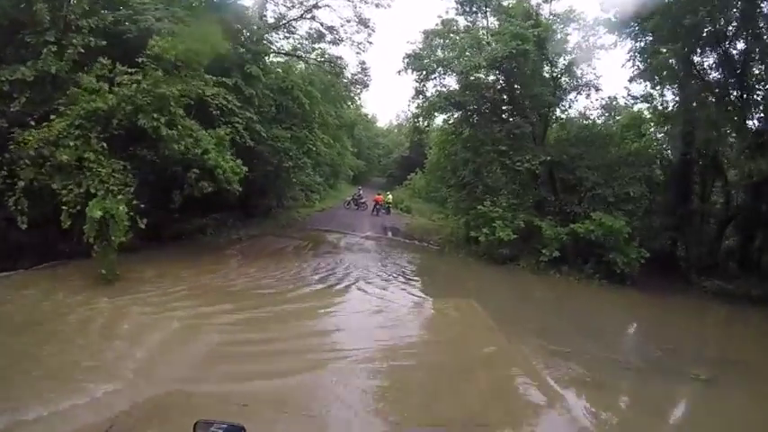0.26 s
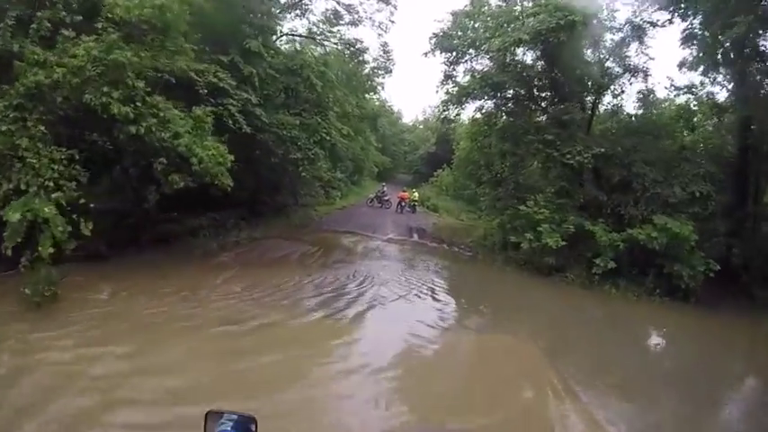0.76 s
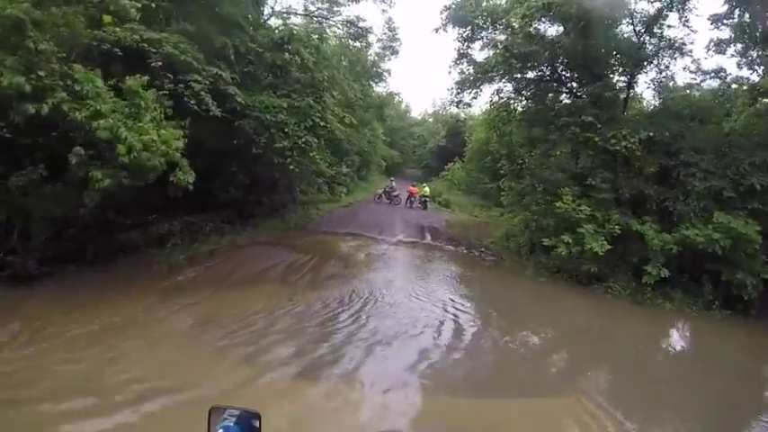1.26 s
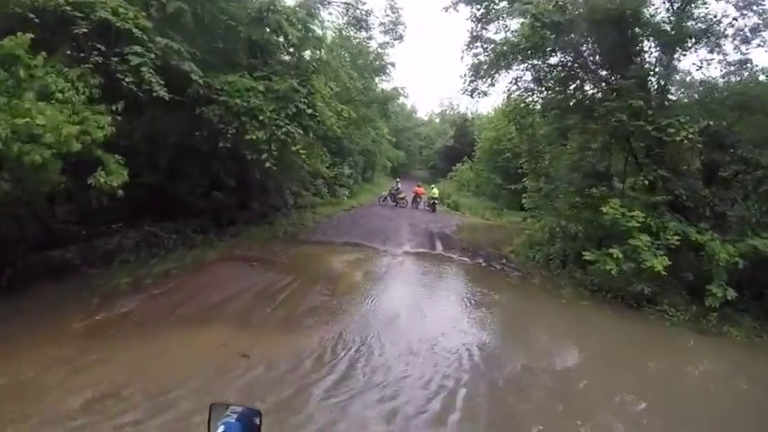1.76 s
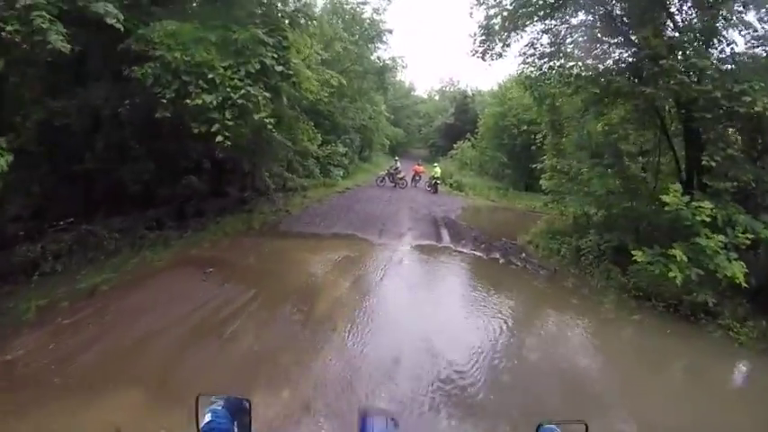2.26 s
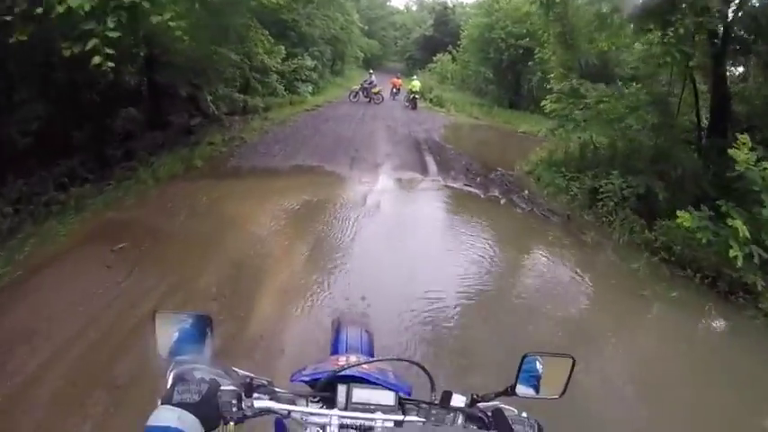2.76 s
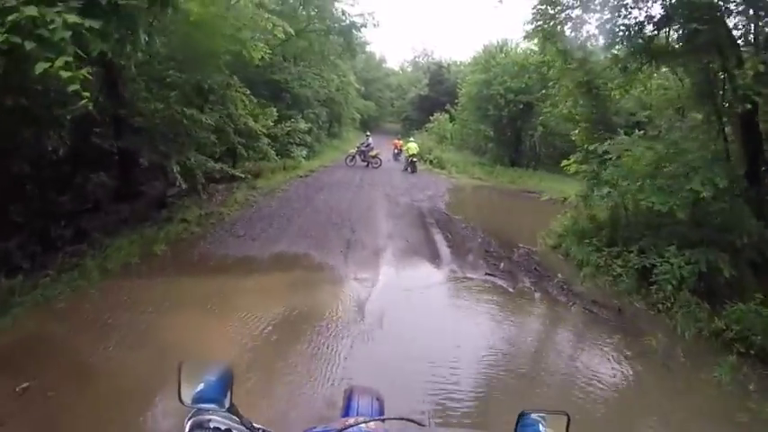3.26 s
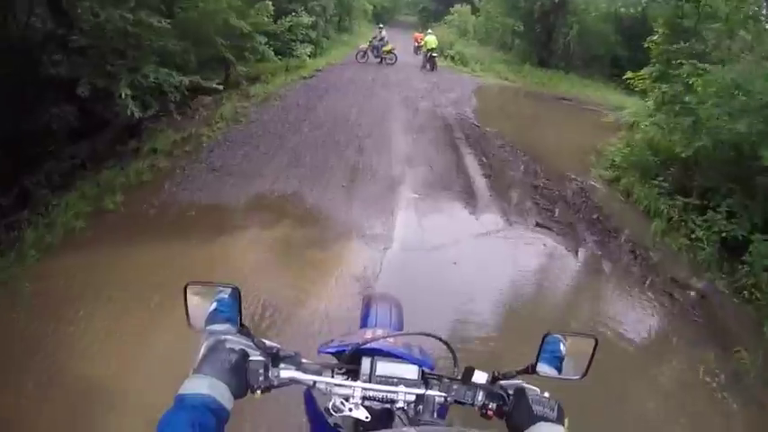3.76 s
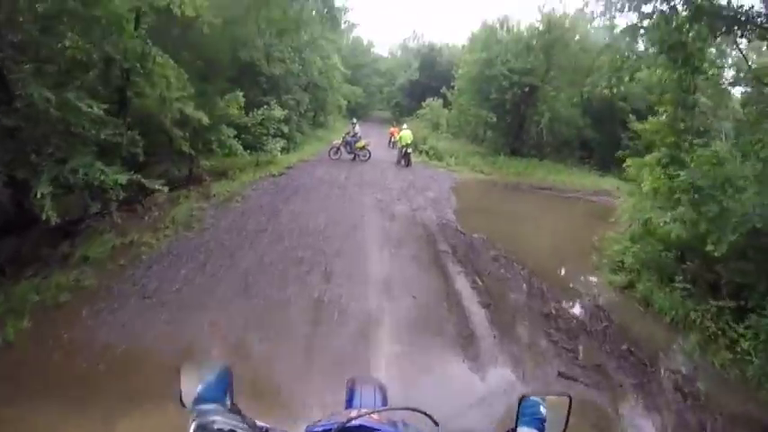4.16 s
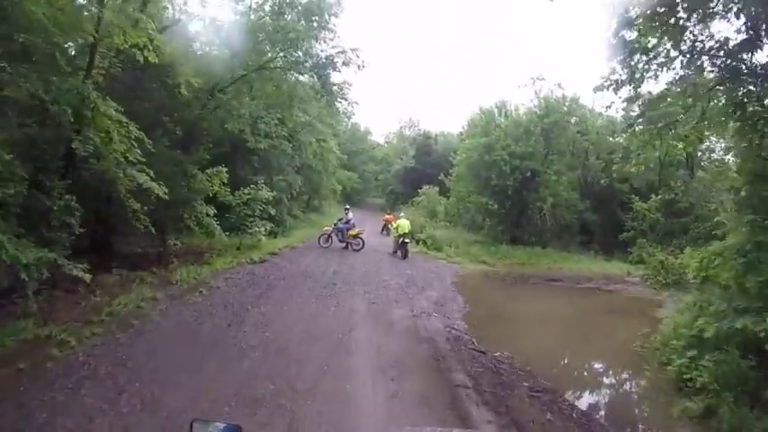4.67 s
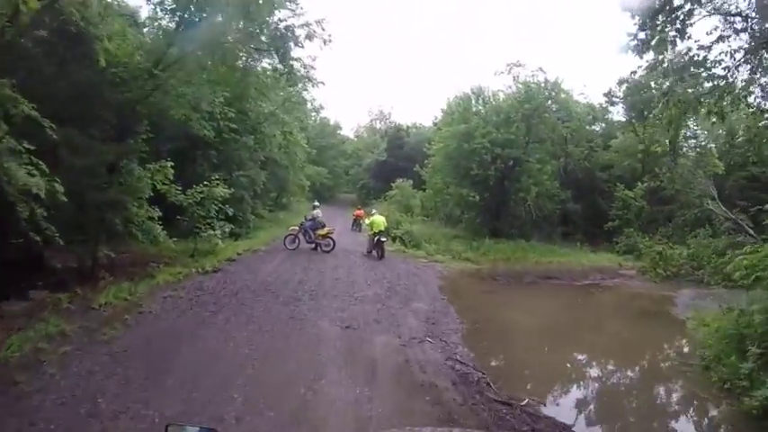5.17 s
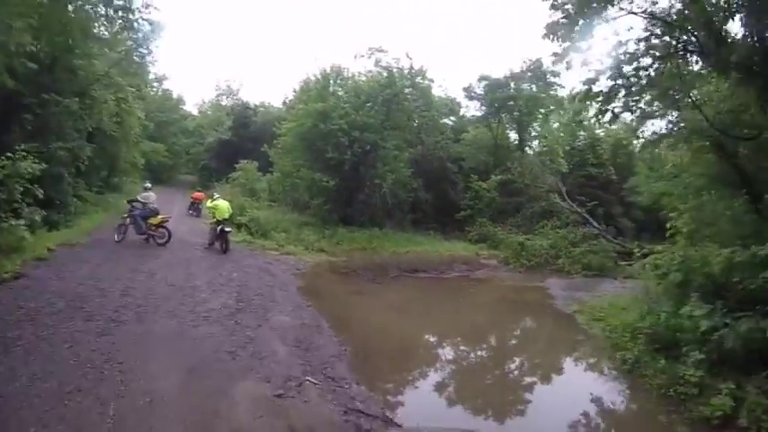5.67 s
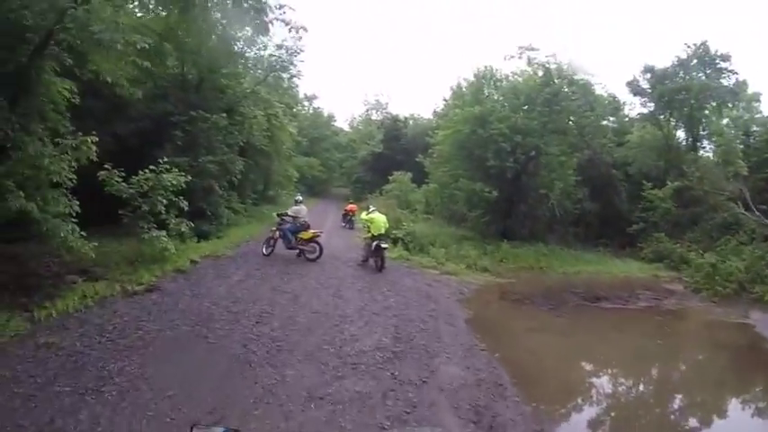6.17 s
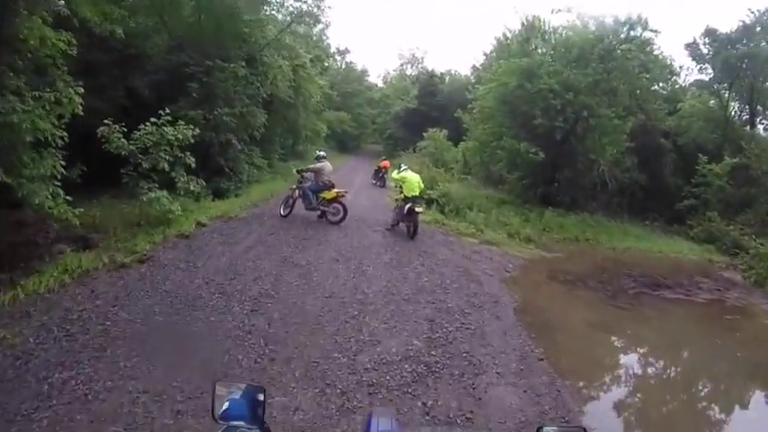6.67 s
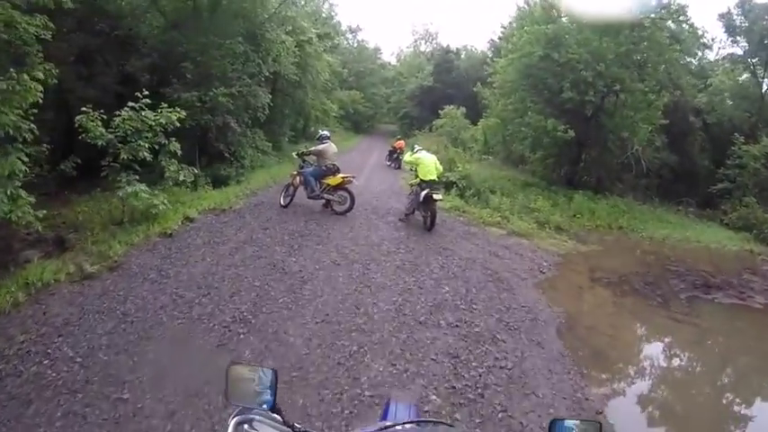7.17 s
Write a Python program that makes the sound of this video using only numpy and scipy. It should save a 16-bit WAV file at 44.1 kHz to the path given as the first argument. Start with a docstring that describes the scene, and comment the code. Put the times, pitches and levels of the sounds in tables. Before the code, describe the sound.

A single-cylinder trail motorcycle is heard close from the rider's helmet, slightly boxed in by a sealed microphone case. From 0 to 2.5 s it chugs at about seventeen firings a second through shallow water: low hollow thumps, raspy intake pulses, faint valve rattle, a deep fluctuating hum, wind rumble and steady hissing spray. A sharp tick with a dull knock lands at 1.2 s; smaller ticks and a knock cluster around 1.9-2.6 s. Around 2.8-3.3 s the engine slows to about fourteen beats, then pulls harder as spray thins and gravel crunch emerges. Knocks and ticks come at 4.4-5.0 s. At 5.3 s a brief throttle blip rises with an airbox honk, drops by 5.9 s, and leaves a softer, slower idle near twelve beats a second. Spray dies away near 7 s, with a last tick and thud, low wind and light crunch until the end at 7.4 s.

```python
"""A single-cylinder trail motorcycle plods through flooded gravel, climbs out, blips and idles.
Each firing excites the damped modes of the exhaust; crank-locked shake, intake and valve noise go with it.
A deep hum locks to the crank near its own pitch. Shaped noise makes the wind, spray and tyre crunch;
decaying modes make sharp ticks and dull knocks. The microphone rides on the helmet in a sealed case,
which colours the spray, the tyres and the valve clatter."""
import sys
import numpy as np
from scipy import signal
from scipy.fft import rfft, irfft, next_fast_len
from scipy.io import wavfile
from scipy.ndimage import uniform_filter1d, map_coordinates

SR = 44100
rng = np.random.default_rng(int(sys.argv[2]) if len(sys.argv) > 2 else 0)


def store_pcm(level_fs):
    """Save levels as 16-bit WAV."""
    pcm = np.round(np.clip(level_fs, -1, 1) * 32767).astype(np.int16)
    wavfile.write(sys.argv[1], SR, np.atleast_2d(pcm).T)


N = 327663
TIME = np.arange(N) / SR  # s

# engine speed: start_s, firings_per_s
ENGINE_SPEED = [(0.0, 18.334), (0.2, 17.282), (1.45, 17.125), (1.9, 16.322), (2.35, 17.013), (2.8, 14.248),
                (3.3, 14.293), (3.6, 15.185), (4.3, 16.05), (5.1, 16.501), (5.33, 23.461), (5.6, 15.369),
                (5.9, 12.425), (6.2, 12.756), (7.43, 12.546)]
# engine load: start_s, thump_db (before a fixed lift), gas_heat (0 cool to 1 hot)
ENGINE_LOAD = [(0, -48, 0.85), (1.3, -47, 0.98), (2.4, -48.5, 0.9), (2.8, -50.5, 0.74), (3.3, -49, 0),
               (3.7, -46, 0.67), (4.5, -47.5, 1), (5.3, -48, 0.63), (5.5, -51.5, 0), (5.65, -55, 0),
               (5.75, -51, 0.45), (6.3, -53, 0), (7.43, -52, 0.3)]
# modes of exhaust pipe and silencer with hot gas: pitch_hz, relative_level_db, t60_s
PIPE_MODES = [(71, -14, 0.017), (87.3, -7.5, 0.28), (100.4, 4.5, 0.22), (206.5, -8.5, 0.097),
              (226.4, -10.5, 0.22), (264.3, 2.5, 0.15), (289.7, -2, 0.11), (325, -7, 0.14),
              (341.7, -18, 0.36), (453, 5.5, 0.11)]
# frame resonance that answers the piston shake: pitch_hz, width_hz
FRAME_RESONANCE = (52.8, 9.3)
# engine noise spectra, relative: pitch_hz, density_db (per Hz)
INTAKE_SPECTRUM = [(300, -42), (500, -2.5), (640, -3), (740, -30.5), (860, -6.5), (1050, 2), (1300, -0.5),
                   (1600, -5.5), (2500, -46)]
AIRBOX_SPECTRUM = [(560, -32), (660, -5), (740, -4), (810, -3), (950, -37)]
CLATTER_SPECTRUM = [(900, -15), (1500, 1.5), (2500, -1.5), (4000, -25), (6000, -22), (10000, -61)]
# deep hum before smoothing and flicker: start_s, level_db
HUM_LEVEL = [(0, -22), (.18, -31), (.33, -21), (.85, -29.5), (1.4, -20.5), (1.7, -27.5), (2.05, -23),
             (2.16, -30), (2.28, -22.5), (2.37, -26.5), (2.55, -20), (3.0, -29.5), (3.3, -39),
             (3.65, -21.5), (3.96, -33.5), (4.17, -21.5), (4.45, -36), (4.8, -24.5), (5.03, -41),
             (5.1, -25.5), (5.24, -23.5), (5.33, -32.5), (5.44, -27.5), (5.8, -35.5), (6.2, -32.5),
             (6.8, -35.5), (7.1, -31), (7.43, -38.5)]
# surroundings: start_s, wind_db, spray_db, gravel_db
ROAD_LEVELS = [(0, -32, -41, -60), (.8, -32.5, -42, -57), (1.5, -34.5, -42.5, -53), (2.1, -25.5, -41, -53),
               (2.8, -28.5, -42.5, -52), (3.6, -36.5, -47, -48), (4.2, -44, -48, -48),
               (4.7, -31.5, -50.5, -47.5), (5.3, -41, -50, -48), (5.8, -36, -51, -50.5),
               (6.5, -34.5, -52.5, -50), (7.0, -29.5, -66, -47), (7.43, -30, -71, -47.5)]
# spectra of the surroundings, relative: pitch_hz, density_db (per Hz)
WIND_SPECTRUM = [(3, -25), (6, 2.5), (12, 4), (22, 0), (33, -15), (44, -0.5), (58, -17), (90, -21.5),
                 (150, -33), (300, -58.5), (600, -120)]
SPRAY_SPECTRUM = [(40, -47), (90, 6), (160, -4.5), (300, -3.5), (400, -7), (800, -10), (1500, 1.5),
                  (3000, -2), (4800, -14), (8500, -26.5), (12000, -27), (15500, -30.5)]
GRAVEL_SPECTRUM = [(40, -36), (100, 2), (170, 1.5), (300, -8.5), (450, -5.5), (550, -15.5), (640, -9),
                   (840, -12), (1500, -6), (2200, -2.5), (3000, -7.5), (4800, -18.5), (8500, -31.5),
                   (15500, -35)]
# resonances and notches of the microphone case: pitch_hz, width_hz, boost_db
CASE_MODES = [(970, 110, 4), (1260, 100, 4), (1413, 370, -8.5), (1850, 90, 1.5), (1902, 138, -5),
              (2173, 210, -4.5), (2460, 252, 7), (2652, 96, 4), (2802, 275, -5.5), (3835, 250, 6),
              (4870, 160, -2), (5505, 470, 9), (7020, 1350, 7.5), (10220, 1900, 5), (12600, 370, 7.5)]
# sharp ticks, as of stones flung on the bodywork: start_s, peak_db, tilt_db_per_octave (about 2 kHz)
TICK_EVENTS = [(0.3894, -33, 8), (1.178, -16, -1.5), (1.8723, -32, -13), (2.0063, -22.5, -3),
               (2.1686, -30, 0), (2.243, -25, -10), (2.3075, -27.5, -2), (2.5682, -30, 4),
               (4.6241, -30, -13), (5.0118, -21, -6), (6.9813, -23.5, 2), (7.394, -33, 4)]
# bodywork modes that a tick excites, before tilt and scatter: pitch_hz, relative_level_db, t60_s
SHELL_MODES = [(800, -12, .008), (1250, -4, .011), (1680, 0, .015), (2100, -2, .011), (2550, 0, .015),
               (3150, -12, .008), (3850, -11, .015), (5500, -24, .01)]
# dull knocks through the frame: start_s, level_db (before a fixed lift and a slow onset)
KNOCK_EVENTS = [(1.179, -44), (2.0, -38.5), (2.804, -56), (3.088, -58), (3.278, -45), (4.372, -42.5),
                (4.479, -47), (4.623, -41), (5.024, -43), (6.987, -37.5)]

KNOCK_HZ, KNOCK_T60_S = 150, 0.25
SHAKE_DB, COOL_BOOM_DB = -43, 3  # shake at resonance; extra low-mode drive with cool gas
# levels at mean load, and the dB gained per dB of load
INTAKE_DB, INTAKE_FOLLOWS = -56.5, 0.4
CLATTER_DB, CLATTER_FOLLOWS = -54, -0.24
# the hum's own pitch, its locking range, and its flicker when free (depth, knots per s)
HUM_HZ, PULL_HZ, FLICKER_DB, FLICKER_RATE = 33.6, 2.2, 4, 14
TOP_HZ = 15300  # upper band limit


def amp(db):
    """Amplitude gain is exponential in level in dB."""
    return 10 ** (np.asarray(db) / 20)


def unit(x):
    """Normalisation to rms 1 separates spectrum from level."""
    return x / np.sqrt(np.mean(x ** 2) + 1e-20)


def curves(rows):
    """Linear interpolation gives each column after the time one value per sample."""
    start_s, *columns = np.transpose(rows)
    return [np.interp(TIME, start_s, column) for column in columns]


def wobble(rate):
    """A spline through random knots, rate of them a second, gives smooth fluctuation."""
    knots = rng.standard_normal(int(N * rate / SR) + 4)
    return map_coordinates(knots, [TIME * rate])


def filtered(x, response):
    """A linear filter multiplies the spectrum by its frequency response."""
    size = next_fast_len(N + SR // 2)
    return irfft(rfft(x, size) * response(np.fft.rfftfreq(size, 1 / SR)), size)[:N]


def rush(spectrum, patchy_db, grit):
    """Turbulent noise of rms 1: dense noise plus sparse grains, patchy in time and frequency."""
    grains = rng.standard_normal(N) * (rng.random(N) < 300 / SR)  # about 300 a second
    noise = rng.standard_normal(N) + grit * unit(grains)
    cells = signal.stft(noise, nperseg=512)[2]
    field = uniform_filter1d(rng.standard_normal(cells.shape), size=6, axis=0)
    field = uniform_filter1d(field, size=12, axis=1)
    patchy = signal.istft(cells * amp(patchy_db * unit(field)), nperseg=512)[1][:N]
    hz, db = np.transpose(spectrum)

    def colour(f):
        return amp(np.interp(np.log(f + 1), np.log(hz + 1), db))
    return unit(filtered(patchy, colour))


def ring(hz, db, t60, t):
    """A damped mode is a sine that loses 60 dB in t60 seconds."""
    return amp(db - 60 * t / t60) * np.sin(2 * np.pi * hz * t)


def case(x):
    """Transmission through the sealed case superposes resonant boosts and notches in dB."""
    def response(f):
        return amp(sum(db / (1 + ((f - hz) / (width / 2)) ** 2) for hz, width, db in CASE_MODES))
    return filtered(x, response)


def crank():
    """Integrating the firing rate gives the cycles gone by in a four-stroke engine."""
    speed, = curves(ENGINE_SPEED)
    return speed, np.cumsum(speed) / SR


def exhaust(cycles, thump_db, heat):
    """Each firing excites the pipe modes; sound is slower in cooler gas, so their pitch drops."""
    fired = np.flatnonzero(np.diff(np.floor(cycles), prepend=-1))
    boom_db = COOL_BOOM_DB * (1 - heat[fired])
    heat = np.clip(heat, 0, 1)
    t = np.arange(SR // 4) / SR
    thumps = np.zeros(N)
    for hz, db, t60 in PIPE_MODES:
        kicks = np.zeros(N)
        # no two burns feed the modes alike
        kicks[fired] = amp(.8 * rng.standard_normal(len(fired)) + boom_db * (hz < 150))
        thumps += signal.fftconvolve(kicks * heat, ring(hz, db, t60, t))[:N]
        thumps += signal.fftconvolve(kicks * (1 - heat), ring(.945 * hz, db, t60, t))[:N]

    def silencer(f):  # 0.8 ms delay and a steep low-pass
        return np.exp(-2j * np.pi * f * .0008) / (1 + (f / 355) ** 10)
    return amp(thump_db + 6.5) * unit(filtered(thumps, silencer))


def piston_shake(cycles):
    """Forced vibration: the piston reverses four times a cycle and drives the frame resonance."""
    reversals = np.sqrt(2) * np.cos(2 * np.pi * 4 * (cycles - .035))
    hz, width = FRAME_RESONANCE

    def frame(f):
        return 1j * f * width / (hz ** 2 - f ** 2 + 1j * f * width)
    return filtered(amp(SHAKE_DB + 1.2 * wobble(1.9)) * reversals, frame)


def intake_and_airbox(speed, cycles, load_db):
    """Periodic inflow before each thump modulates intake noise; the airbox honks as revs rise."""
    gulp = amp(6 * np.cos(2 * np.pi * (cycles - .85)) + 1.2 * wobble(14))
    intake_db = INTAKE_DB + INTAKE_FOLLOWS * load_db
    intake = amp(intake_db) * unit(gulp * rush(INTAKE_SPECTRUM, patchy_db=-1.0, grit=0.68))
    honk_db = -55 + 1.6 * np.minimum(speed - 20, 0)  # full from 20 firings per s
    honk = amp(honk_db) * unit(np.sqrt(gulp) * rush(AIRBOX_SPECTRUM, patchy_db=1, grit=0))
    return intake + honk


def valve_clatter(cycles, load_db):
    """Amplitude modulation once per crank turn makes the valve gear rattle."""
    rattle = amp(5 * np.cos(2 * np.pi * 2 * (cycles - .15)) + 2.5 * wobble(30))
    clatter_db = CLATTER_DB + CLATTER_FOLLOWS * load_db
    return amp(clatter_db) * unit(rattle * rush(CLATTER_SPECTRUM, patchy_db=0.0, grit=0.62))


def engine():
    """Phase locking ties exhaust, shake, intake and valve sounds to one crank."""
    speed, cycles = crank()
    thump_db, heat = curves(ENGINE_LOAD)
    load_db = thump_db - thump_db.mean()
    low = exhaust(cycles, thump_db, heat) + piston_shake(cycles)
    return low + intake_and_airbox(speed, cycles, load_db) + case(valve_clatter(cycles, load_db))


def hum():
    """Frequency pulling: a deep tone follows the crank near its own pitch, else wavers and flickers."""
    speed, _ = crank()
    level_db, = curves(HUM_LEVEL)
    turn_hz = 2 * speed  # two crank turns per firing
    free = 1 - 1 / (1 + ((turn_hz - HUM_HZ) / PULL_HZ) ** 4)  # 0 locked to 1 free
    hz = (1 - free) * turn_hz + free * HUM_HZ
    phase = 2 * np.pi * (np.cumsum(hz) / SR - .1) + (.15 + .7 * free) * wobble(5)
    swell = uniform_filter1d(amp(level_db), size=SR // 30)  # a heavy body cannot change its swing at once
    flicker = amp(FLICKER_DB * free * np.tanh(wobble(FLICKER_RATE)))
    return np.sqrt(2) * swell * flicker * np.cos(phase)


def road():
    """Broadband noise: wind buffets the case directly; spray gives way to gravel crunch."""
    wind_db, spray_db, gravel_db = curves(ROAD_LEVELS)
    gusts = amp(1.3 * wobble(4))
    wind = amp(wind_db) * unit(gusts * rush(WIND_SPECTRUM, patchy_db=1, grit=0))
    spray = amp(spray_db + 0.15 * wobble(6.2)) * rush(SPRAY_SPECTRUM, patchy_db=-1.1, grit=0.24)
    gravel = amp(gravel_db + 0.35 * wobble(8.5)) * rush(GRAVEL_SPECTRUM, patchy_db=0.65, grit=0.082)
    return wind + case(spray + gravel)


def ticks():
    """Impact excitation rings the shell modes, with pitch and strength scattered at every tick."""
    out, t = np.zeros(N + SR), np.arange(SR // 20) / SR
    onset = 1 - np.exp(-(t / .0004) ** 2)
    for start_s, peak_db, tilt_db in TICK_EVENTS:
        tick = np.zeros(len(t))
        for hz, db, t60 in SHELL_MODES:
            pitch_hz = hz * rng.normal(1, 0.016)
            mode_db = db + tilt_db * np.log2(hz / 2000) + rng.normal(0, 1)
            tick += ring(pitch_hz, mode_db, t60, t)
        tick *= onset
        out[round(start_s * SR):][:len(t)] -= amp(peak_db) * tick / np.abs(tick).max()
    return out[:N]


def knocks():
    """A single damped mode: a low panel rings briefly after each jolt, with a soft onset."""
    out, t = np.zeros(N + SR), np.arange(SR // 2) / SR
    onset = 1 - np.exp(-t / 0.019)
    for start_s, level_db in KNOCK_EVENTS:
        out[round(start_s * SR):][:len(t)] += ring(KNOCK_HZ, level_db + 6.5, KNOCK_T60_S, t) * onset
    return out[:N]


def scene():
    """Superposition: all sound pressures add at one microphone."""
    return (engine() + hum() + road() + ticks() + knocks())[None]


def record(dry):
    """Band limiting removes everything above TOP_HZ, after a 6.7 ms fade-in."""
    faded = dry[0] * np.minimum(TIME / 0.0067, 1)
    return filtered(faded, lambda hz: hz < TOP_HZ)[None]


dry = scene()
out = record(dry)
store_pcm(out)
```